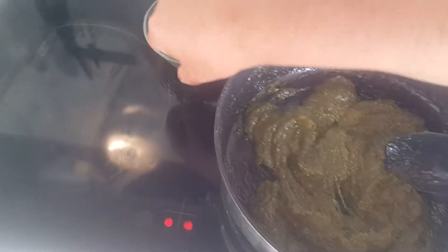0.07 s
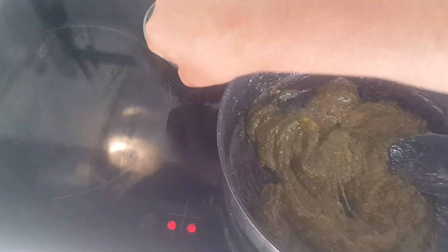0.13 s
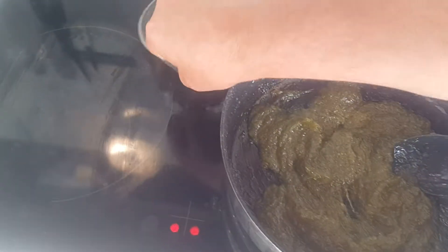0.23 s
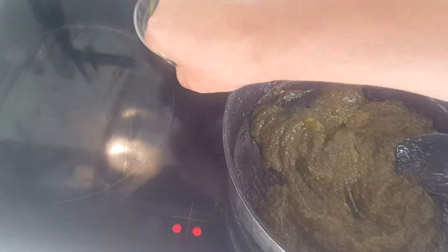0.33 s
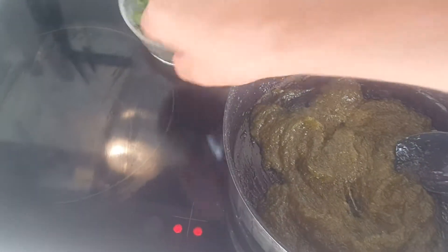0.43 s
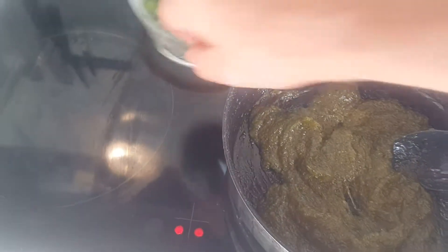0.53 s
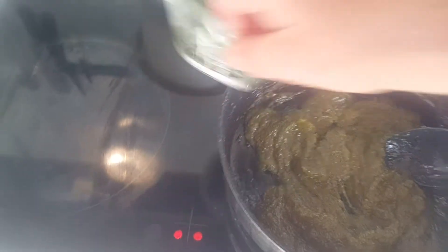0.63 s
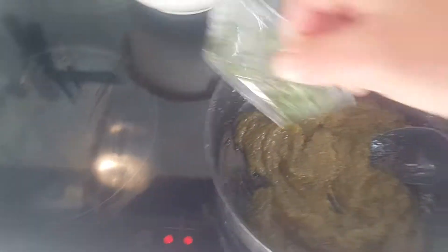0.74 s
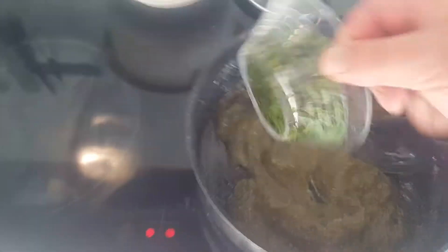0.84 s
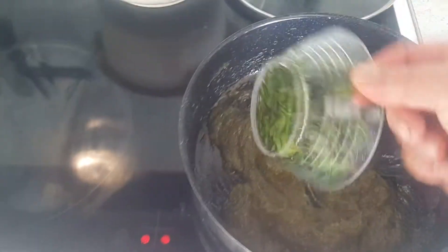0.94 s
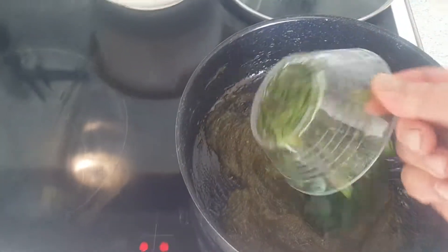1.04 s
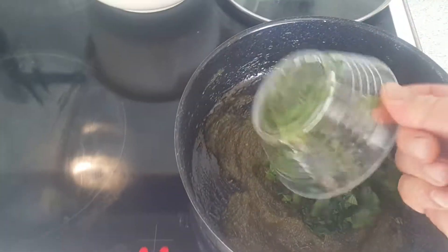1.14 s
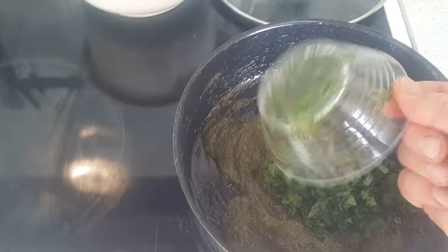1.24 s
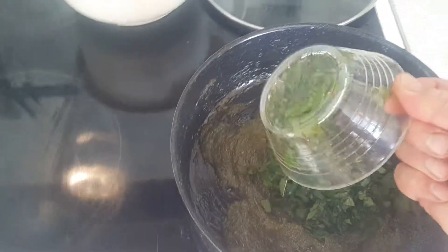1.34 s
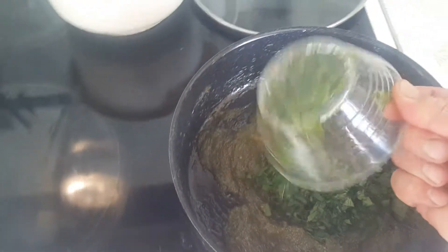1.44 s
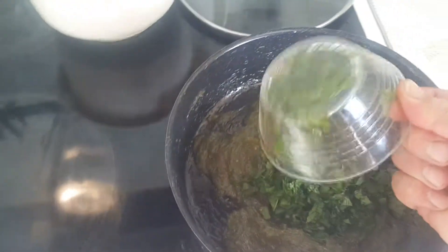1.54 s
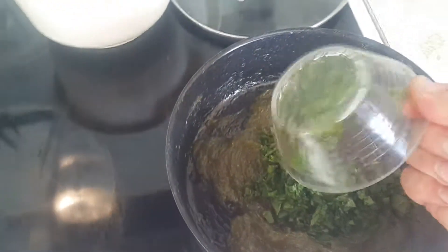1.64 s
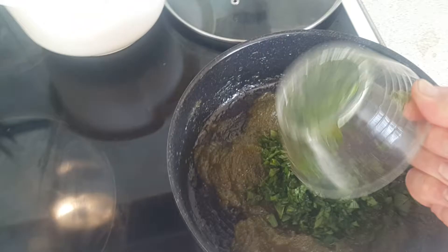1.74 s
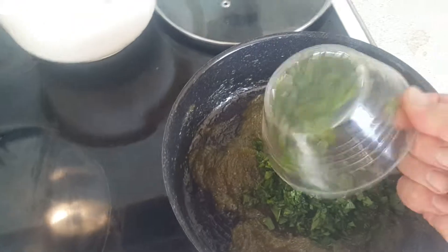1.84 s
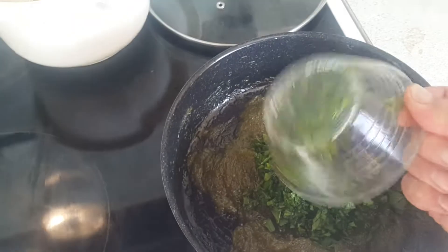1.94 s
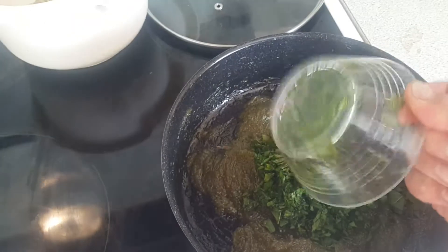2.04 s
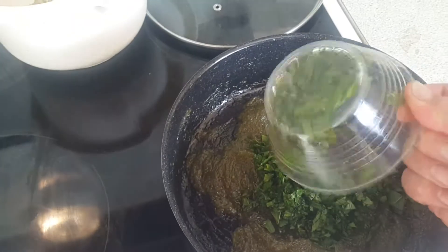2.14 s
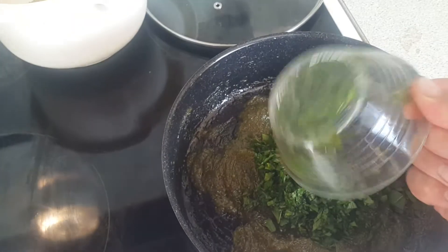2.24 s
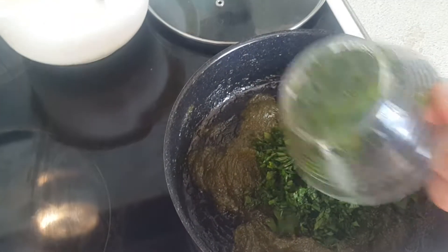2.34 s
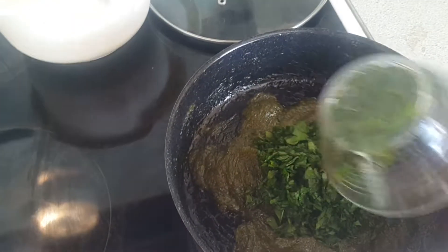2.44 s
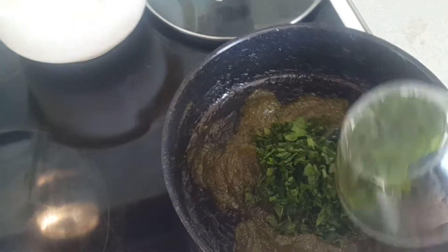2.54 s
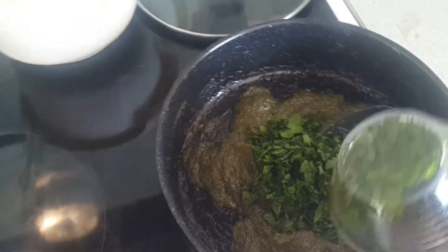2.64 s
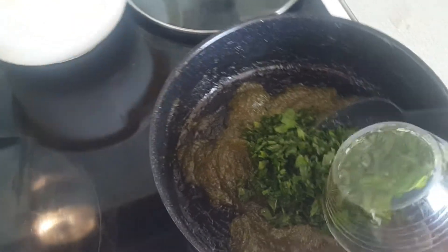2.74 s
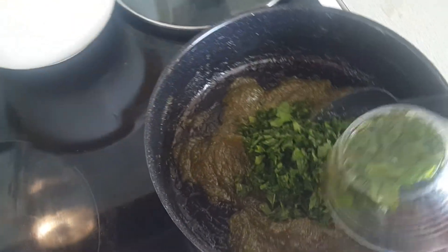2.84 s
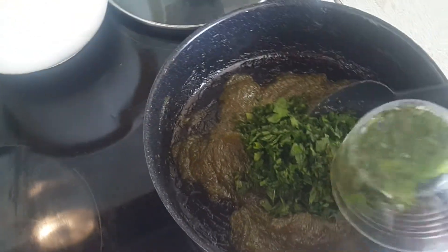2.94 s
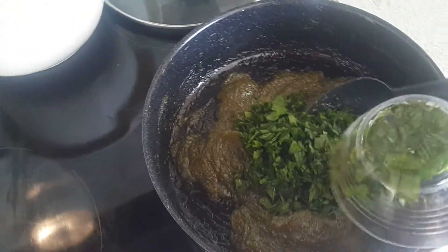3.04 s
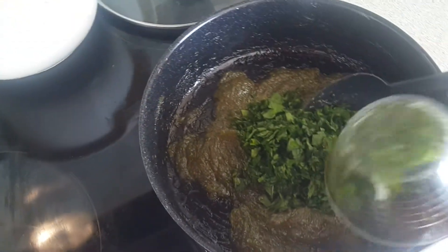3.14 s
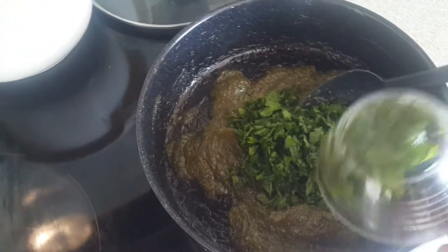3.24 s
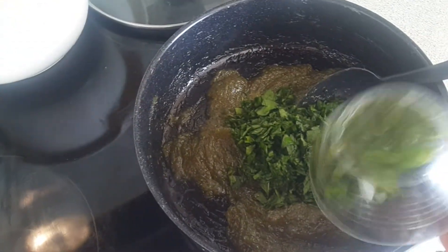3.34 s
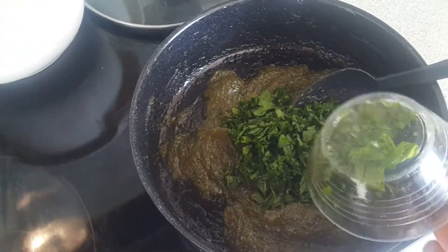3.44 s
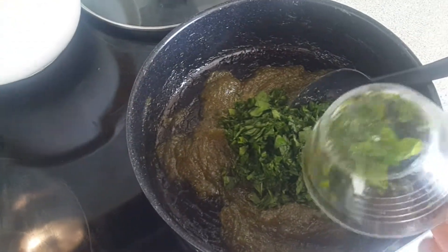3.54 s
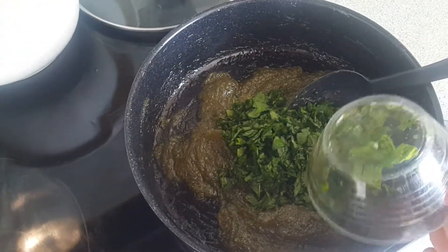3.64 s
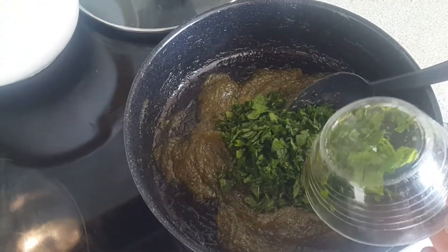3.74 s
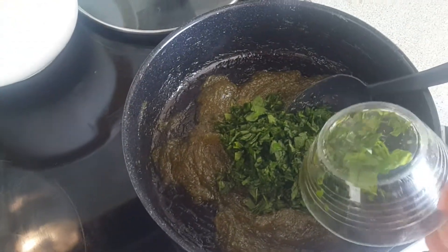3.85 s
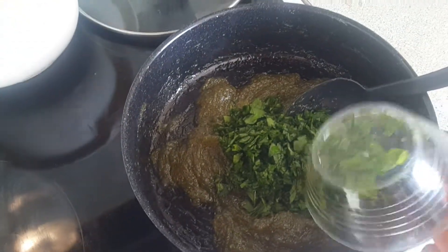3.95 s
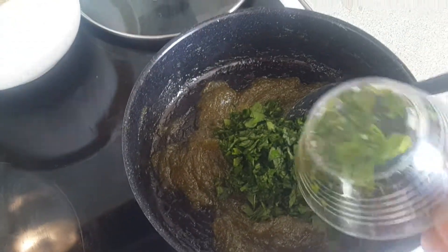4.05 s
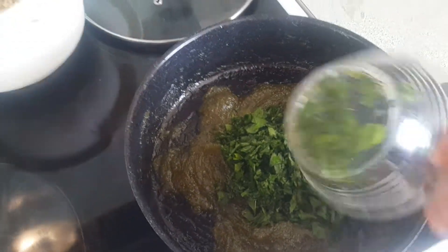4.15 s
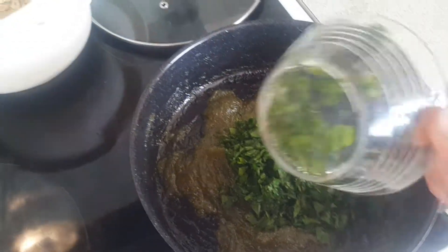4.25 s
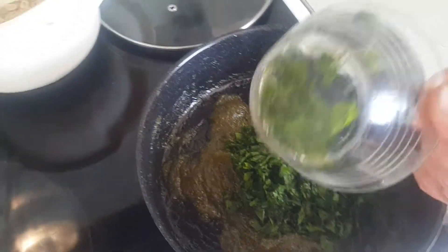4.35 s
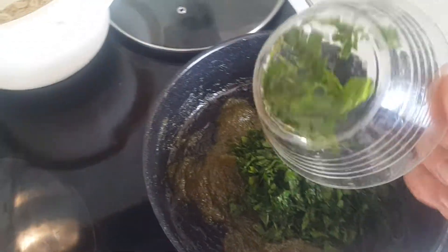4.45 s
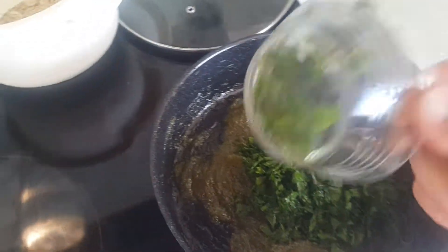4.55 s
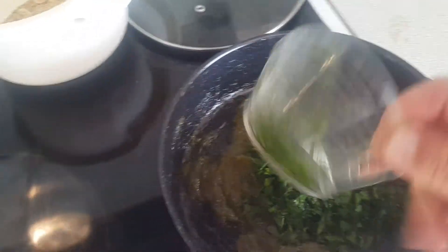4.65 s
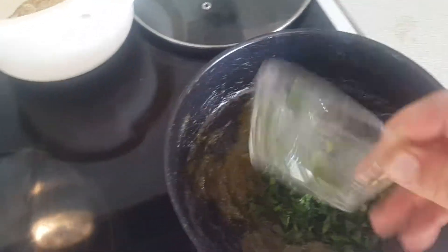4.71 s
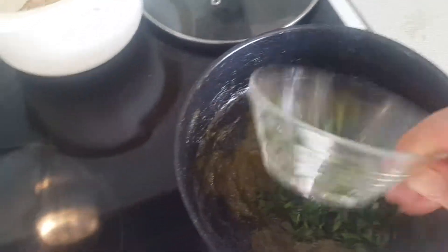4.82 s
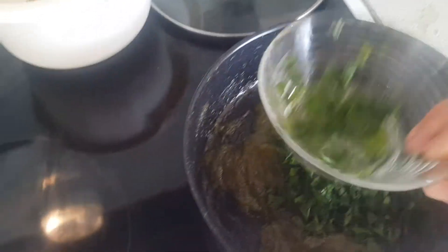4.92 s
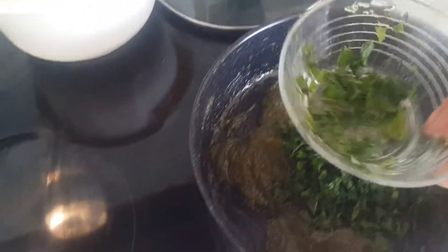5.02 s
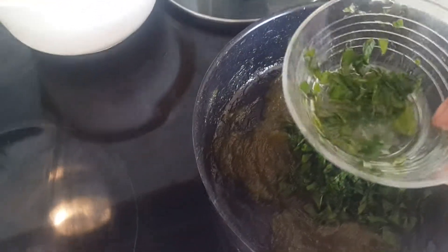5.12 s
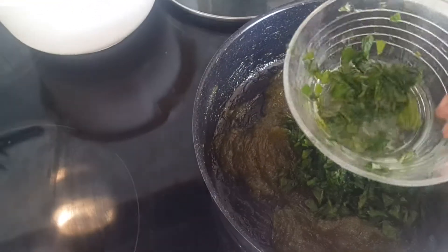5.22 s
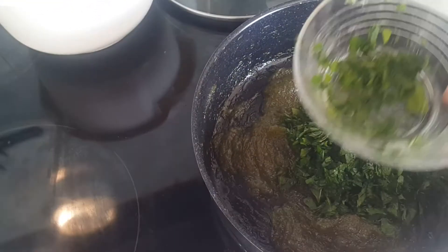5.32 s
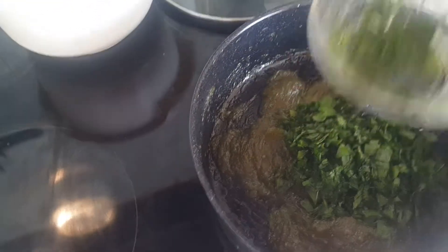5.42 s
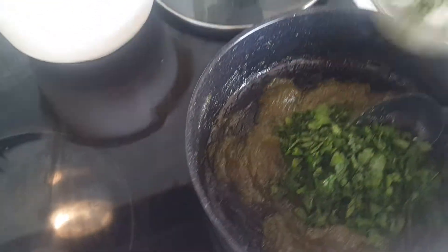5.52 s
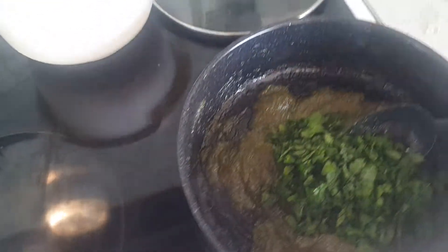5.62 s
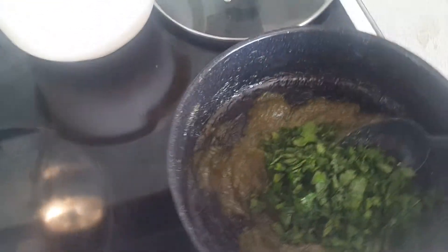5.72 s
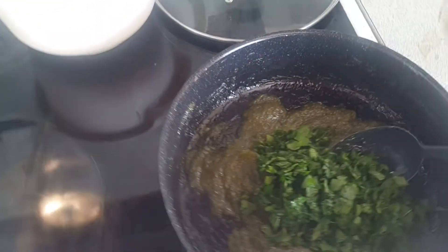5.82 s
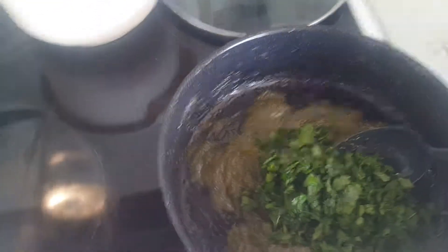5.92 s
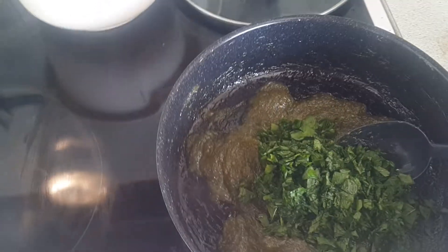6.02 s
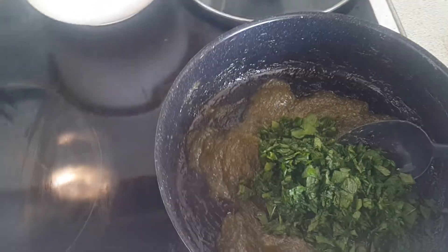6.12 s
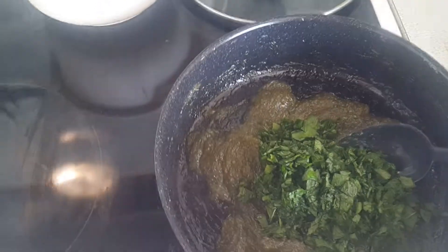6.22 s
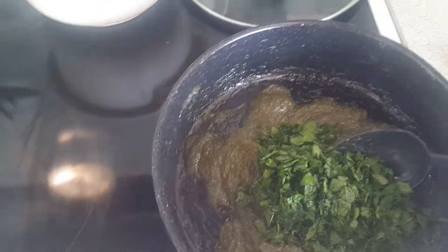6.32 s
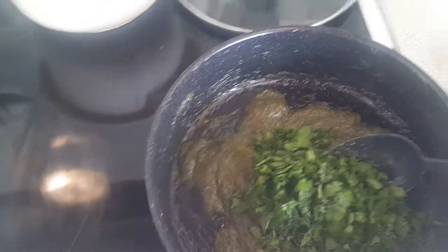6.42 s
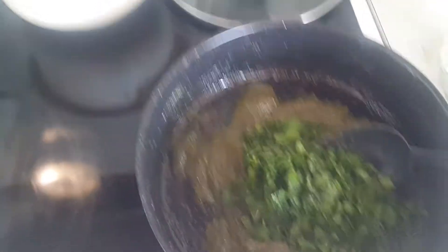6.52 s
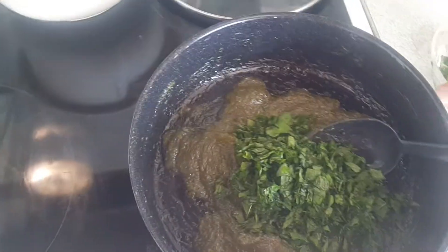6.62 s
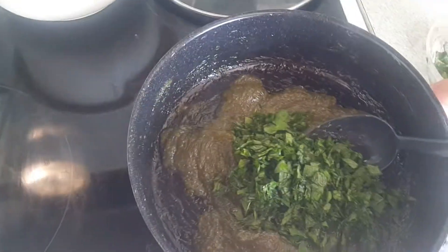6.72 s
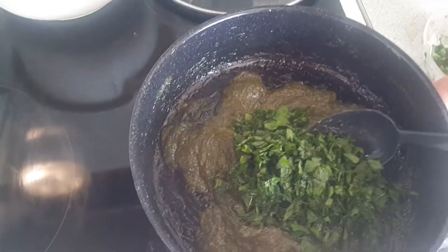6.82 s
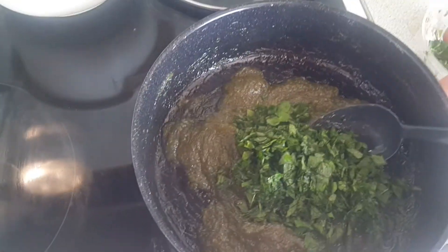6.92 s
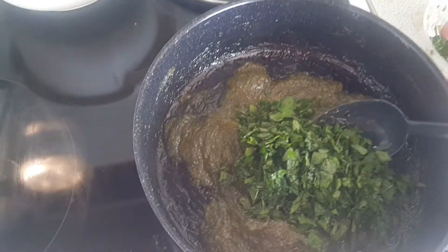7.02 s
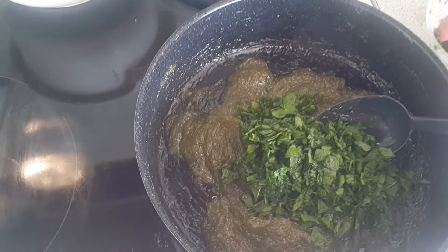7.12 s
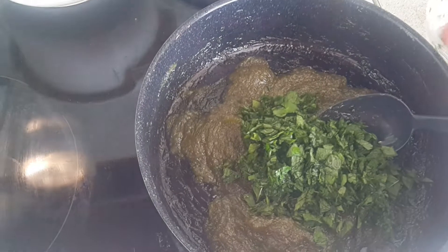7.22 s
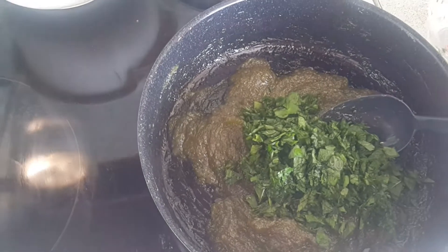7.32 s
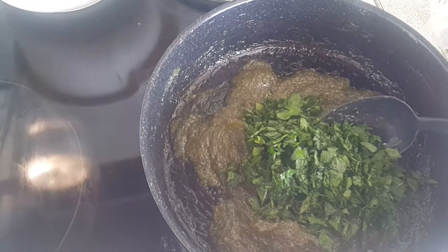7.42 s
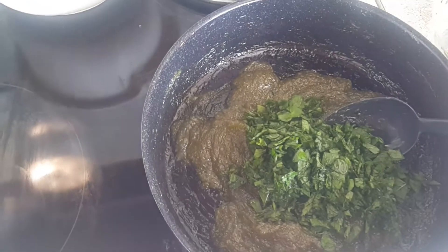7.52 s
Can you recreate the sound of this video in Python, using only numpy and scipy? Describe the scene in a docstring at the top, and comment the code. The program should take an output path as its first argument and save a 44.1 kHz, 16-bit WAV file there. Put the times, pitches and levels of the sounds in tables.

```python
"""Herb bowl knocked out over a pan

A glass bowl is knocked on a spoon resting on a pan: taps, four of them with a slam and rebound.
Modes and dense noise ring behind each blow. The bowl then lands on the worktop, rocks and slides.
Filtered pulses make the touches, noise bursts the wet herbs, swelling tones the squeaks of wet glass.
A hob hums and paste crackles below. The gain ducks at loud peaks, holds for a second and comes back."""
import sys
import numpy as np
from scipy import signal
from scipy.fft import rfft, irfft
from scipy.io import wavfile
from scipy.ndimage import uniform_filter1d, minimum_filter1d

SR = 44100
rng = np.random.default_rng(int(sys.argv[2]) if len(sys.argv) > 2 else 0)


def transcribe(signal):
    """Save signal, clipped to [-1, 1], as a 16-bit WAV file at the path in sys.argv[1]."""
    frames = np.atleast_2d(signal).T
    limited = np.clip(frames, -1, 1)
    pcm = np.round(limited * 32767).astype(np.int16)
    wavfile.write(sys.argv[1], SR, pcm)


N = 333837
TAIL = 32768   # length of one struck sound, samples
AGE = np.arange(TAIL) / SR   # seconds since the blow
TIME = np.arange(N) / SR   # seconds since the start


# Resonances of the pan. Each row: frequency in Hz, relative level in dB, t60 in seconds.
PAN_MODES = [(143, -33.5, .3), (153, -31.5, .35), (212, -35, .2), (324, -19, .25), (469, -26, .22),
             (527, -25, .2), (638, -23.5, .33), (723, -23, .2), (924, -18, .24), (968, -24, .22),
             (990, -24, .32), (1055, -27, .38), (1210, -24, .25), (1706, -20.5, .28), (1800, -28.5, .35),
             (2099, -29, .24), (2342, -30.5, .2), (2616, -34, .3), (2730, -29, .33), (2865, -33, .3),
             (3170, -29.5, .33), (3480, -36, .2), (4505, -35, .28), (5421, -40, .33), (6420, -35, .15),
             (4780, -35, .36), (4925, -38.5, .34)]
# Dense upper ring of the pan in the room. Each row: frequency in Hz, relative level in dB per Hz.
PAN_WASH = [(25, -39.5), (115, -24), (150, -14.5), (230, -14), (310, -5.5), (500, -3), (950, -1.5),
            (1450, -8), (1750, -3.5), (2400, -11.5), (4000, -19), (5100, -16.5), (8000, -32), (11500, -29),
            (15000, -25)]
# Hollow knock of the spoon bedded in paste. Each row: frequency in Hz, relative level in dB, t60 in seconds.
SPOON_MODES = [(279.5, -25.5, 0.21), (696, -20.5, 0.017), (805, -23.5, 0.084), (933, -6.5, 0.063),
               (1635, -13, 0.078)]
PORT_LAG_S = .00014   # the left port hears the contact this much later


def knocks():
    """The spoon passes each blow to the pan: a thud, a sharp crack, then the pan rings and the spoon chatters."""
    out = np.zeros((2, N))
    hollow = 0
    for hz, db, t60 in SPOON_MODES:
        hollow = hollow + from_db(db) * dying(t60) * np.sin(2 * np.pi * hz * AGE)
    pulse = thud(low_hz=584, high_hz=1530, order=3) + hollow * (1 - np.exp(-AGE / 0.0016))
    contact = np.array([np.interp(AGE - PORT_LAG_S, AGE, pulse), pulse])

    def pan_wash():
        """One draw of the pan's dense ring."""
        return wash(PAN_WASH, early_db=5.5, early_t60=.085, rise_s=0.0015)

    shared = pan_wash()
    for s, db, ring_db, bright_db, bass_db in knock_contacts():
        crack = from_db(-12.5) * filtered(diffuse(PAN_WASH, TAIL), 2900, "high") * dying(0.042)
        # the same pan in the same room, but never struck on quite the same spot
        body = from_db(-23.0) * (shared + pan_wash())
        body = body + from_db(-2.5) * ringing(PAN_MODES, spread_db=1.0)
        body = body + from_db(-17.5) * chatter()
        blow = from_db(-1.0) * contact + crack + from_db(ring_db) * body
        add(out, s, from_db(db) * shelved(blow, bright_db, bass_db))
    return out


# The bowl taps the spoon; a firm knock then slams the spoon on the pan.
# Each row: start in seconds, tap level in dB, tap ring in dB, tap brightness in dB,
# slam delay in seconds (3 ms or less: no slam), slam level in dB, rebound against slam in dB.
KNOCKS = [(2.8175, -5.5, -2.5, -16, 0.000047, 0, 0), (3.0116, -9, -2, -3, 0, 0, 0),
          (3.118, -0.5, -10.5, -2, .028, 12.5, -9), (3.4181, 8.5, -1.5, 4, 0.013, 8, -5),
          (3.684, 4.5, -6.5, -3.5, .0056, 11, -15.5), (3.8762, 3, -3, -1, 0.015, 6.5, -30)]
TAP_BASS_DB = 3.5
SLAM_RING_DB, SLAM_BRIGHT_DB, SLAM_BASS_DB = 1.95, -0.8, -5.5
REBOUND_S, REBOUND_RING_DB, REBOUND_BASS_DB = .019, 7, -6


def knock_contacts():
    """A knock is a tap, then if firm a slam and one rebound: (s, level, ring, brightness, bass dB)."""
    for s, db, ring_db, bright_db, delay_s, slam_db, rebound_db in KNOCKS:
        yield s, db, ring_db, bright_db, TAP_BASS_DB
        if delay_s > .003:
            slam_s = s + delay_s
            yield slam_s, slam_db, SLAM_RING_DB, SLAM_BRIGHT_DB, SLAM_BASS_DB
            yield slam_s + REBOUND_S, slam_db + rebound_db, REBOUND_RING_DB, SLAM_BRIGHT_DB, REBOUND_BASS_DB


def chatter(per_s=140, t60=0.12):
    """The loose spoon buzzes on the rim: uneven bright clicks that die away."""
    clicks = (rng.random(TAIL) < per_s / SR) * rng.uniform(.4, 1, TAIL) * dying(t60)
    click_colour = [(600, -13.0), (1600, -6.0), (2900, -3.5), (4000, -8.0),   # Hz, relative dB per Hz
                    (5300, -1.5), (6500, -4.5), (8000, -13.5), (15000, -10.5)]
    click = diffuse(click_colour, TAIL) * dying(0.019)
    return signal.fftconvolve(clicks[None], click, axes=1)[:, :TAIL]


# Resonances of glass bowl and worktop. Each row: frequency in Hz, relative level in dB, t60 in seconds.
BOWL_MODES = [(154.4, -29, 0.19), (246, -33, 0.19), (317, -27.5, .25), (478, -25.5, 0.36),
              (576, -32.5, 0.51), (723, -23, 0.34), (799, -19.5, 0.16), (865, -23.5, 0.33), (1222, -28, .3),
              (1300, -27, .3), (1450, -26, .33), (1500, -21, .2), (1595, -21, .23), (1652, -14.5, .37),
              (1852, -33, .35), (3176, -33, .39), (4940, -56, .5), (13400, -52, .2), (2300, -36, 0.22),
              (2535, -31, .18), (14260, -55, 0.24)]
# Dense ring of bowl and worktop. Each row: frequency in Hz, relative level in dB per Hz.
BOWL_WASH = [(25, -40), (110, -26.5), (160, -7.5), (240, -22), (480, -8), (800, -0.5), (1300, -2),
             (1650, 1), (2050, -10.5), (3100, -13.5), (3700, -29), (5000, -31), (7000, -49.5), (15000, -47)]


def bowl_set_down():
    """The thick glass base lands and rocks: each contact is a thud that sets bowl and worktop ringing."""
    out = np.zeros((2, N))
    contact = thud(low_hz=1130, high_hz=1580, order=3) * panned(5.0)
    for s, db, ring_db, bright_db in rocking():
        body = from_db(-14.0) * wash(BOWL_WASH, early_db=7.5, early_t60=0.046, rise_s=0.0023)
        body = body + from_db(1.5) * ringing(BOWL_MODES, spread_db=1.6)
        blow = contact + from_db(ring_db) * body * panned(0.47)
        add(out, s, from_db(db) * shelved(blow, bright_db))
    return out


# Landings of the bowl on the worktop. Each row: start in seconds, level in dB, ring in dB,
# brightness of the landing in dB, first bounce in seconds, loss per bounce in dB.
SET_DOWN = [(6.0607, -6.5, -3.5, 1.5, .014, 8.5), (6.1079, -7.5, -3, 2, .0185, 2),
            (6.2328, -10, 5.5, -2, .0048, 2.5)]
BOUNCE_SHRINK, BOUNCE_DULL_DB = .86, -12   # each bounce is shorter than the last, and duller than the landing


def rocking(count=4):
    """Each landing is followed by ever quicker, weaker bounces: (s, level, ring, brightness dB)."""
    for s, db, ring_db, bright_db, bounce_s, loss_db in SET_DOWN:
        yield s, db, ring_db, bright_db
        for k in range(count):
            s = s + bounce_s * BOUNCE_SHRINK ** k
            yield s, db - loss_db * (k + 1), ring_db, bright_db + BOUNCE_DULL_DB


# The clearer touches of hand, bowl and spoon. Each row: start in seconds, level in dB, pitch in Hz.
TOUCHES = [(.076, -37, 610), (.182, -32.5, 600), (.254, -34.5, 800), (.914, -43.5, 1140),
           (1.565, -43, 1110), (1.885, -44, 800), (4.70, -44, 3880), (5.04, -35.5, 920),
           (5.215, -42.5, 1000), (5.483, -39.5, 990), (5.824, -43, 1300), (7.244, -33.5, 1150),
           (7.492, -40, 970)]
# Colour of the ring after a touch. Each row: frequency in Hz, relative level in dB per Hz.
TOUCH_WASH = [(100, -9.5), (400, 6.5), (750, 4.5), (1600, -3), (2300, -15.5), (5000, -29), (8000, -45),
              (15000, -39.5)]
# Soft bumps of handling. Each row: start in seconds, level in dB, pitch in Hz.
BUMPS = [(.776, -38, 131), (1.186, -47, 99)]
# Wet leaves letting go of the glass. Each row: start in seconds, initial level in dB.
LEAVES = [(1.12, -54), (4.2, -59), (5.491, -57), (7.471, -56)]
GRAZE_S, GRAZE_DB = .005, -11   # a touch grazes just before it lands


def handling():
    """Small taps and dull bumps are filtered pulses; wet leaves are short bursts of bright noise."""
    out = np.zeros((2, N))
    tail = from_db(-13.5) * wash(TOUCH_WASH, early_db=6.0, early_t60=0.13, rise_s=0.00068)
    for s, db, hz in [*TOUCHES, *fidgets()]:
        touch = thud(hz / 1.35, hz * 1.26) + tail
        add(out, s - GRAZE_S, from_db(db + GRAZE_DB) * touch)
        add(out, s, from_db(db) * touch)
    for s, db, hz in BUMPS:
        add(out, s, from_db(db) * thud(hz / 1.8, hz * 1.5))
    leaf_colour = [(500, -24), (3000, 9), (8000, -13), (15000, -6)]   # Hz, relative dB per Hz
    for s, db in LEAVES:
        add(out, s, from_db(db) * dying(0.3) * diffuse(leaf_colour, TAIL))
    return out


FIDGETS_PER_S, FIDGET_DB, FIDGET_HZ = 3.2, -47.5, 1040   # fainter touches; pitch is the middle of an octave


def fidgets(count=40):
    """Fingers shift on the bowl at random moments: (s, level dB, pitch Hz)."""
    wait, pitch = rng.random((count, 2)).T
    times = np.cumsum(-np.log(1 - wait)) / FIDGETS_PER_S
    rows = np.c_[times, np.full(count, FIDGET_DB), FIDGET_HZ * 2 ** (pitch - .5)]
    return rows[(times > GRAZE_S) & (times < N / SR)]   # the graze needs room before it


# Loudness outline of the bowl pushed along the worktop. Each row: time in seconds, level in dB before trim.
SLIDE = [(6.8, -66), (6.808, -68), (6.92, -51), (6.976, -55), (7.004, -42.5), (7.02, -55), (7.07, -46),
         (7.2, -59.5)]
# Short resonances of the rub. Each row: frequency in Hz, relative level in dB, t60 in seconds.
SLIDE_MODES = [(730, 0.5, 0.064), (876, -2, 0.027), (1200, 3, 0.012), (1680, -2.5, 0.011)]
SLIDE_TRIM_DB = 2.1


def slide(slips_per_s=900):
    """Glass sticks and slips on the worktop; the slips set short resonances ringing."""
    s, db = np.transpose(SLIDE)
    slips = (rng.random(N) < slips_per_s / SR) * rng.standard_normal(N)
    rub = signal.fftconvolve(slips[None], ringing(SLIDE_MODES, spread_db=3.5), axes=1)[:, :N]
    level = from_db(SLIDE_TRIM_DB + np.interp(TIME, s, db))
    return rms_one(rub) * level * (TIME > s[0]) * (TIME < s[-1])


# Faint squeaks of wet glass. Each row: middle in seconds, length in seconds, pitch in Hz, peak level in dB.
SQUEAKS = [(4.617, 0.19, 1021, -55.5), (6.308, 0.14, 9460, -63.5), (6.339, 0.064, 7020, -57.5)]


def squeaks():
    """Short, slightly unsteady tones that swell and fade."""
    out = np.zeros(N)
    for s, length, hz, db in SQUEAKS:
        swell = np.sin(np.pi * np.clip((TIME - s) / length + .5, 0, 1)) ** 2
        waver = rms_one(filtered(rng.standard_normal(N), 15, "low"))   # phase, radians
        out += from_db(db) * swell * np.sin(2 * np.pi * hz * TIME + waver)
    return out


# Colour of hob fan and room. Each row: frequency in Hz, relative level in dB per Hz.
AIR = [(12, -35), (30, -18), (60, -9.5), (130, -4.5), (241, -11), (400, -8), (513, -4.5), (600, -10.5),
       (1000, -11.5), (1780, -17), (4000, -26), (5090, -27), (7030, -40.5), (15800, -32)]
AIR_DB = -54   # rms
# Hob fan tones. Each row: frequency in Hz, rms level in dB.
HUM = [(100, -81), (135.5, -64), (204, -68.5), (310, -68), (512, -66.5), (678, -69)]


def hob(waver_hz=4.2):
    """Steady fan noise with a few tones whose phase wavers slowly."""
    out = from_db(AIR_DB) * diffuse(AIR, N)
    for hz, db in HUM:
        # a second of run-in lets the filter settle
        waver = rms_one(filtered(rng.standard_normal(N + SR), waver_hz, "low")[SR:])
        out = out + from_db(db) * np.sqrt(2) * np.sin(2 * np.pi * hz * TIME + 1.1 * waver)
    return out


def simmer(level_db=-74):
    """The warm paste crackles faintly: random pops, each a short tick of noise."""
    pop_db = 2 * np.minimum(rng.exponential(1, N), 3)
    pops = (rng.random(N) < 120 / SR) * from_db(pop_db)   # 120 a second
    tick_colour = [(400, -8), (1500, 0), (5000, -6), (7000, -17), (15000, -17)]   # Hz, relative dB per Hz
    tick = diffuse(tick_colour, TAIL) * dying(.025)
    return from_db(level_db) * rms_one(signal.fftconvolve(pops[None], tick, axes=1)[:, :N])


def thud(low_hz, high_hz, order=2):
    """The contact itself: a band-passed impulse, height 1."""
    band_hz = [low_hz, max(high_hz, low_hz + 20)]
    pulse = filtered(signal.unit_impulse(TAIL), band_hz, "band", order=order)
    return pulse / np.abs(pulse).max()


def ringing(modes, spread_db):
    """Each blow excites every mode anew; high modes reach the two ports out of step."""
    out = 0
    for hz, db, t60 in modes:
        apart = np.arccos(np.clip(at_hz(LIKENESS, hz), -1, 1)) * rng.choice([-.5, .5])
        phase = rng.uniform(0, 2 * np.pi) + apart * np.array([[1], [-1]])
        gain = from_db(db + spread_db * rng.standard_normal()) * panned(at_hz(PORTS, hz))
        onset = 1 - np.exp(-AGE * hz)
        out = out + gain * dying(t60) * np.sin(2 * np.pi * hz * AGE + phase) * onset
    return out


# Decay of the kitchen. Each row: frequency in Hz, t60 in seconds.
KITCHEN_T60 = [(100, 1), (260, 0.45), (700, 0.39), (1800, 0.42), (5000, 0.39), (13000, .28)]


def wash(spectrum, early_db, early_t60, rise_s):
    """Dense ringing: a quick burst off hob and tiles, then the kitchen's tail, dying octave by octave."""
    hz = np.fft.rfftfreq(TAIL, 1 / SR)
    steps_hz = 70 * np.arange(320)
    # crowded upper modes stand out unevenly
    uneven_db = 5 * np.interp(hz, steps_hz, rng.standard_normal(len(steps_hz))) * hz / (hz + 900)
    noise = rfft(diffuse(spectrum, TAIL)) * from_db(uneven_db)
    centres = np.geomspace(100, 12800, 8)
    out = 0
    for centre, share in zip(centres, np.eye(len(centres))):
        band = irfft(noise * at_hz(np.c_[centres, share], hz))
        early = from_db(early_db) * dying(early_t60)
        out = out + band * np.hypot(dying(at_hz(KITCHEN_T60, centre)), early)
    return out * (1 - np.exp(-AGE / rise_s))


# Likeness of the two microphone ports. Each row: frequency in Hz, left-right correlation from -1 to 1.
LIKENESS = [(60, .65), (150, 0.77), (350, 0.93), (900, 0.165), (1300, -0.06), (2400, 0.028), (6000, 0)]
# Balance of the ports. Each row: frequency in Hz, left minus right in dB.
PORTS = [(60, -0.5), (150, 4.5), (400, -1.5), (1300, 2.5), (2400, -0.5), (4400, 4.5), (8000, 11.5),
         (11000, 3), (15000, -2.5)]


def diffuse(spectrum, size):
    """Coloured noise from all sides, as two microphone ports hear it; rms 1."""
    hz = np.fft.rfftfreq(size, 1 / SR)
    mid, side = rfft(rng.standard_normal((2, size)))
    alike = np.clip(at_hz(LIKENESS, hz), -1, 1)
    both = np.sqrt(1 + alike) * mid + np.sqrt(1 - alike) * side * [[1], [-1]]
    coloured = both * from_db(at_hz(spectrum, hz)) * panned(at_hz(PORTS, hz))
    return rms_one(irfft(coloured, size))


def shelved(x, treble_db, bass_db=0, treble_hz=2600, bass_hz=330):
    """A hard contact lifts the treble; one that leans on the body lifts the bass."""
    x = x + (from_db(treble_db) - 1) * filtered(x, treble_hz, "high", order=1)
    return x + (from_db(bass_db) - 1) * filtered(x, bass_hz, "low", order=1)


def filtered(x, hz, kind, order=2):
    """Causal Butterworth filter."""
    return signal.sosfilt(signal.butter(order, hz, kind, fs=SR, output="sos"), x + 1e-18)


def dying(t60):
    """Envelope that falls 60 dB in t60 seconds."""
    return np.exp(-np.log(1000) * AGE / t60)


def panned(db):
    """Left and right gains for a level difference."""
    return from_db(np.array([[.5], [-.5]]) * db)


def from_db(db):
    """Decibels to gain."""
    return 10 ** (np.asarray(db) / 20)


def rms_one(x):
    """Scale to unit rms."""
    return x / np.sqrt(np.mean(x ** 2) + 1e-20)


def at_hz(points, hz):
    """Read a table on a log-frequency axis."""
    known_hz, values = np.transpose(points)
    return np.interp(np.log(np.maximum(hz, 1)), np.log(known_hz), values)


def add(out, s, sound):
    """Mix a sound in at a time in seconds."""
    start = int(round(s * SR))
    out[:, start:start + TAIL] += sound[..., :N - start]


def scene():
    """Everything at the stove, from the knocks down to the simmer."""
    return knocks() + bowl_set_down() + handling() + slide() + squeaks() + hob() + simmer()


def gain_control(x, limit_db=-9, most_db=12, hold_s=1.127, release_db_per_s=22):
    """Loud peaks pull the gain down at once; it is held, then creeps back."""
    power = uniform_filter1d((x ** 2).max(axis=0), size=176)
    over_db = np.clip(10 * np.log10(np.abs(power) + 1e-12) - limit_db, 0, most_db)
    half = int(hold_s * SR / 2)
    # the largest excess within the past hold time
    held_db = -minimum_filter1d(-over_db, 2 * half + 1, origin=half, mode="constant")
    release_db = release_db_per_s * TIME
    cut_db = np.maximum.accumulate(held_db + release_db) - release_db
    return x * from_db(-uniform_filter1d(cut_db, size=64))


CUTOFF_HZ = 16000


def record(dry):
    """Gain control, rounded peaks, and the top cut off."""
    rounded = 1.562 * np.tanh(gain_control(dry) / 1.585)
    return signal.sosfilt(signal.ellip(10, .1, 80, CUTOFF_HZ, fs=SR, output="sos"), rounded)


dry = scene()
out = record(dry)
transcribe(out)
```